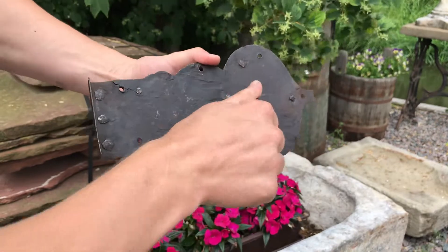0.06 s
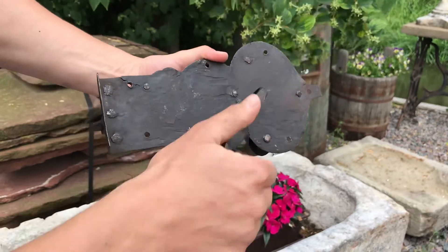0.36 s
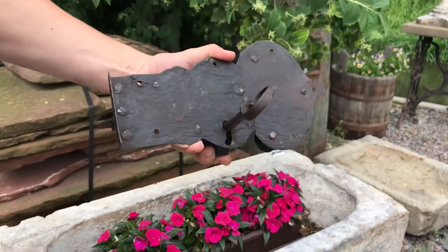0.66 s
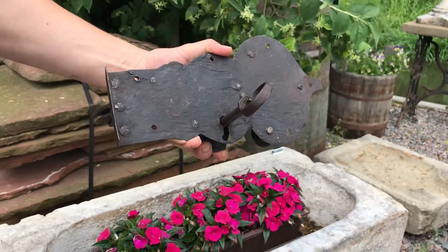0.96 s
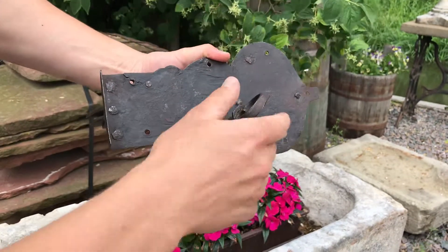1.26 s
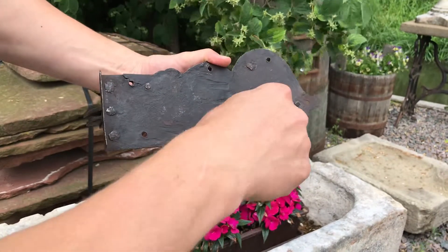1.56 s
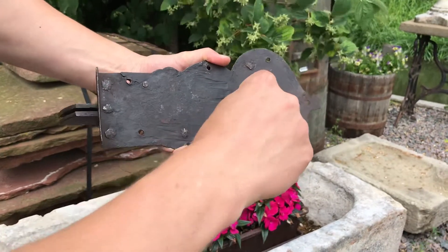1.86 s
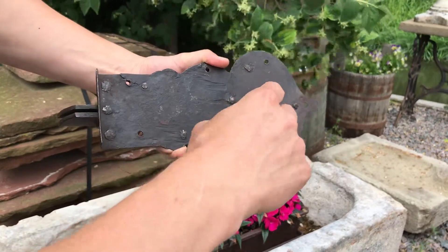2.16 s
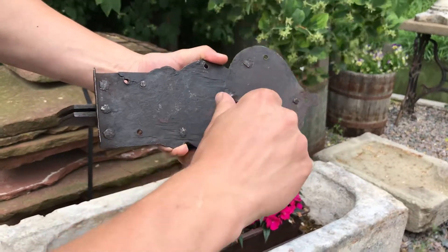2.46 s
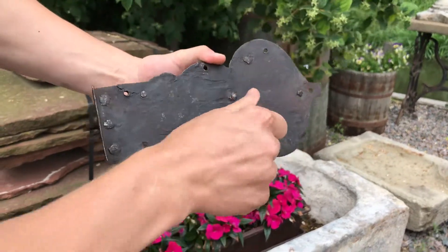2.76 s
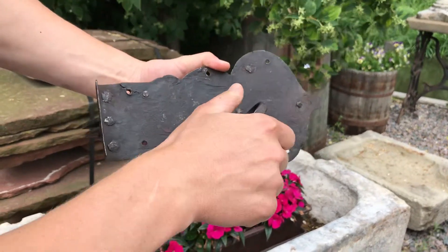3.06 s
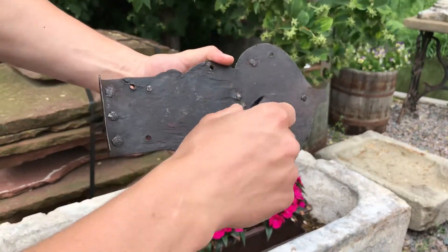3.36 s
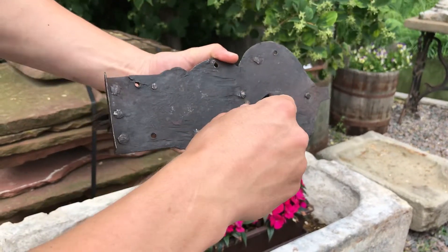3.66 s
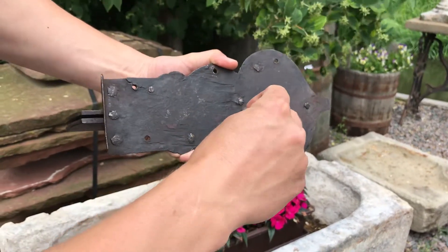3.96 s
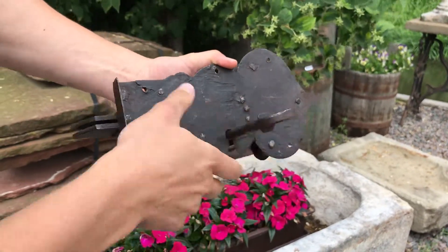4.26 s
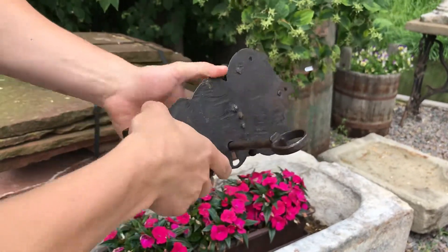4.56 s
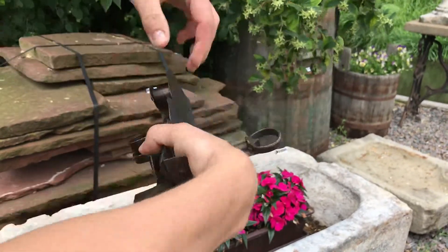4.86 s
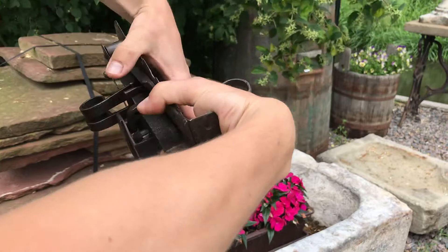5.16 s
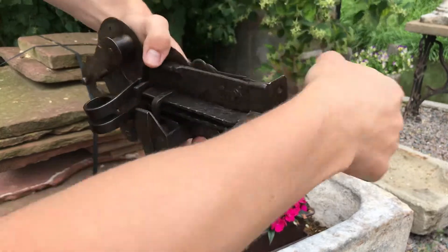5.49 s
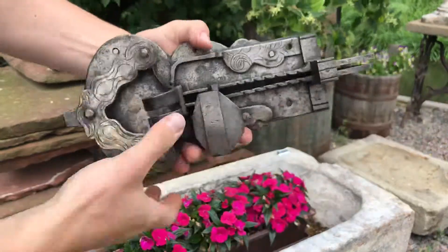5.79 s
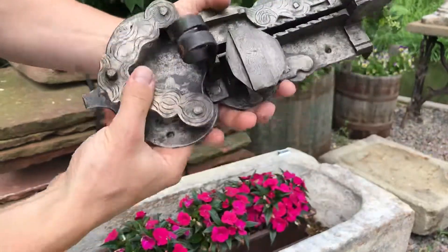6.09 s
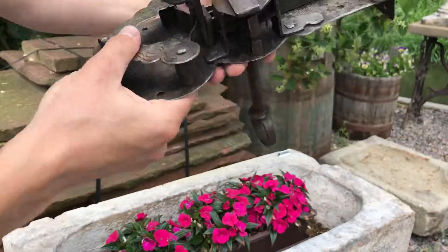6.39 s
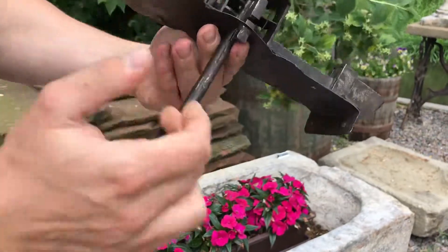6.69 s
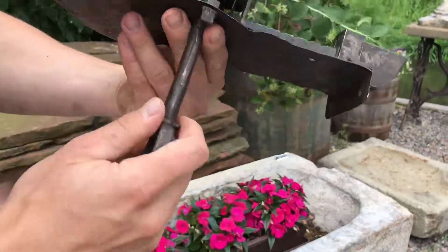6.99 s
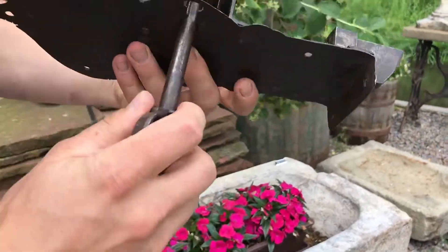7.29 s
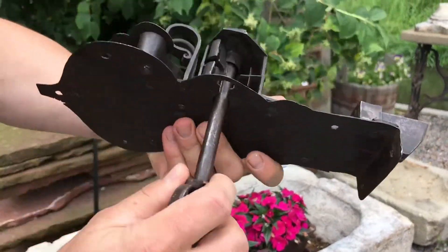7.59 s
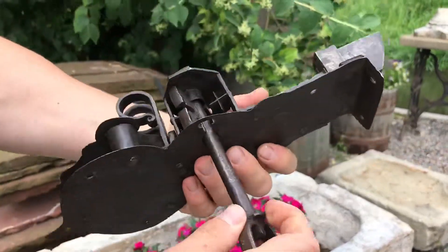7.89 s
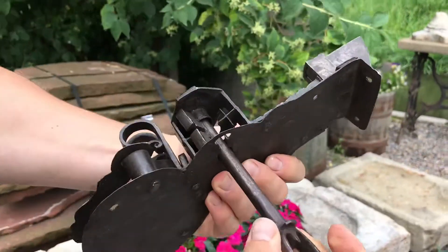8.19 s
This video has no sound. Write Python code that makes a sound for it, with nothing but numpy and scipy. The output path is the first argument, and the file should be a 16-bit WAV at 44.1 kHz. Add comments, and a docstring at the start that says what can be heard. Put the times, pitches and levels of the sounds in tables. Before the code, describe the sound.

An old iron door lock is worked by hand close to the microphone in a garden. Gusty wind rumbles and thumps on the microphone throughout, over a soft hush of leaves and very faint, distant bird chirps. A catch snaps sharply right at the start, followed by a tiny tick at about 0.7 seconds. At 1.8 seconds the key throws the sprung bolts in a loud, chattering metallic clack that rings briefly. Two smaller sharp snaps come at about 2.5 and 2.8 seconds, and a second loud clack at 3.8 seconds. From 4 to 6 seconds there is only faint iron rubbing under the wind. Between 6.2 and 7.4 seconds the loose key ticks and clinks irregularly, most clearly near 6.4 and 7.2 seconds. Faint scraping and wind continue until the end, just after 8 seconds. The impacts have only a slight outdoor echo.

```python
"""An old iron door lock is worked by hand in a garden. From the start wind buffets the microphone
and small birds call far away. A catch snaps; then the key throws the sprung bolts, which chatter home
in a loud clack that rings the case. More catches snap and the bolts are thrown again. Last, iron rubs
and the loose key clinks as the lock is turned over. A wall answers each impact faintly."""
import sys
import numpy as np
from scipy import signal
from scipy.fft import rfft, irfft, next_fast_len
from scipy.io import wavfile
from scipy.ndimage import uniform_filter1d, minimum_filter1d, map_coordinates

SR = 44100
rng = np.random.default_rng(int(sys.argv[2]) if len(sys.argv) > 2 else 0)


def unload_wav(signal):
    """Save mono or channel-first audio to the path in sys.argv[1] as 16-bit WAV at rate SR, clipped to [-1, 1]."""
    wavfile.write(
        sys.argv[1],
        SR,
        np.round(np.clip(np.atleast_2d(signal).T, -1, 1) * 32767).astype(np.int16),
    )


N = 363384
RING_T = np.arange(SR // 4) / SR  # the life of one blow, in seconds


def amp(db):
    """Decibels to amplitude ratio."""
    return 10 ** (np.asarray(db) / 20)


def unit(x):
    """The signal scaled to rms 1."""
    return x / np.sqrt(np.mean(x ** 2) + 1e-20)


def along(points, hz):
    """Interpolation of (Hz, value) points on a logarithmic frequency axis."""
    knots_hz, values = np.transpose(points)
    return np.interp(np.log(hz + 1), np.log(knots_hz + 1), values)


def wobble(rate):
    """A smooth random curve with `rate` knots a second."""
    return map_coordinates(rng.standard_normal(int(N * rate / SR) + 4), [np.arange(N) * rate / SR])


def noise(spectrum, size=len(RING_T)):
    """White noise filtered to a (Hz, dB) spectrum, at rms 1."""
    m = next_fast_len(size)
    gain = amp(along(spectrum, np.fft.rfftfreq(m, 1 / SR)))
    return unit(irfft(rfft(rng.standard_normal(m)) * gain, m)[:size])


def hump(hz, slope_db):
    """The spectrum of a broad resonance, whose skirts fall about slope_db an octave."""
    return [(hz / 16, -4 * slope_db), (hz / 1.1, 0), (hz * 1.1, 0), (hz * 16, -4 * slope_db)]


def fade(t60):
    """Damping: an exponential decay that loses 60 dB in t60 seconds."""
    return np.exp(-np.log(1000) * RING_T / t60)


def add(track, s, sound):
    """Superposition: a sound joins the track at s seconds."""
    start = max(round(s * SR), 0)
    track[start:start + len(sound)] += sound[:N - start]


def garden():
    """Broadband noise: leaves and open air make an almost steady hush."""
    # The hush. Each row: frequency in Hz, spectral level in dB.
    spectrum = [(260, -13), (450, -2), (792, -4.5), (947, 0.5), (1500, -5), (1770, -6.5), (2210, -10.5),
                (3560, -10.5), (3900, -11.5), (4800, -16), (5330, -15), (10600, -25), (13600, -23.5),
                (15800, -29.5)]
    return amp(-51.5 + 0.44 * wobble(26)) * noise(spectrum, N)


def scattered(x):
    """Diffuse scattering: hedges, pots and gravel spread a sound out in time."""
    # The garden's reverberation. Each row: frequency in Hz, t60 in seconds.
    decay_times = [(200, .25), (1500, 0.29), (5000, 0.548), (14000, 0.4)]
    hz, t, bands = signal.stft(rng.standard_normal(SR // 2), SR, nperseg=256)
    decay = amp(-60 * t / along(decay_times, hz)[:, None])
    tail = signal.istft(bands * decay, SR, nperseg=256)[1]
    return signal.fftconvolve(x, tail / np.linalg.norm(tail))[:N]


def echoes(x):
    """Reflection: a stone wall returns a dull copy 61 ms late, amid the garden's thin scatter."""
    wall = np.zeros(N)
    add(wall, .061, signal.lfilter(*signal.butter(1, 3500, fs=SR), x))
    return amp(-28.5) * (scattered(x) + wall)


def birds():
    """Frequency modulation: thin whistles glide and warble, blurred by scattering on their long way."""
    # Far calls. Each row: start and length in seconds, first and last pitch in Hz,
    # warble as a share of pitch, relative level in dB.
    calls = [(0.25, 0.172, 4636, 4665, 0.0073, -52.5), (1.149, 0.48, 4015, 3510, 0.098, -55.5),
             (2.191, .16, 3270, 3700, 0.0077, -57.5), (2.928, 0.0436, 2460, 2830, 0.0094, -55),
             (3.282, 0.257, 4008, 4200, .09, -56.5), (3.362, .045, 5646, 4100, .015, -57),
             (3.55, 0.047, 5200, 4230, 0.0223, -50), (5.429, 0.1186, 6480, 6220, 0.0277, -55.5),
             (5.803, 0.258, 3870, 3580, 0.0493, -55)]
    # One bird's repeated falling chip. Each row: start in seconds, relative level in dB.
    chips = [(6.09, -55), (6.79, -57), (6.921, -53), (7.045, -55), (7.43, -55)]
    chip_calls = [(s, .032, 5900, 5200, .015, db) for s, db in chips]
    track = np.zeros(N)
    for s, length, start_hz, end_hz, warble, db in calls + chip_calls:
        progress = np.linspace(0, 1, int(length * SR))
        glide = start_hz + (end_hz - start_hz) * np.sin(np.pi / 2 * progress)
        turns = map_coordinates(rng.standard_normal(64), [progress * length * 55], mode="mirror")
        trill = .012 * np.sin(2 * np.pi * 130 * progress * length)
        hz = glide * (1 + warble * turns + trill)
        syllables = amp(60 * warble * np.tanh(-unit(np.gradient(turns))))  # voiced on downward sweeps
        swell = np.sqrt(np.abs(np.sin(np.pi * progress)))
        add(track, s, amp(db) * syllables * swell * np.sin(2 * np.pi * np.cumsum(hz) / SR))
    return amp(-3) * track + amp(-8) * scattered(track)


def gust_power(rows, sag_db, release_s):
    """Incoherent sources add in power: each (start, length, dB) gust rises fast, sags and dies away."""
    attack_s = 0.00472
    t, power = np.arange(N) / SR, np.zeros(N)
    for s, length, db in rows:
        near = (t > s - .1) & (t < s + length + .3)
        age = t[near] - s
        edges = np.exp(np.minimum(age, 0) / attack_s - np.maximum(age - length, 0) / release_s)
        level_db = db - sag_db * (np.clip(age / length, 0, 1) - .5)
        power[near] += (amp(level_db) * edges) ** 2
    return power


def wind():
    """Turbulence at the microphone: big eddies rumble throughout, small ones flutter in the gusts."""
    # The breeze between gusts. Each row: time in seconds, relative level in dB.
    breeze = [(0.0, -43.5), (0.69, -31), (1.19, -28), (1.42, -44), (2.02, -28.5), (3.14, -31.5), (3.3, -43),
              (5.62, -38), (5.83, -41), (6.47, -31), (7.14, -42.5), (7.3, -38), (7.78, -41), (8.24, -22)]
    # Gusts. Each row: start and length in seconds, relative rumble and flutter levels in dB.
    gusts = [(0.17, 0.036, -21, -44.5), (0.226, 0.063, -25.5, -44.5), (0.414, 0.032, -24.5, -49),
             (0.622, 0.087, -22.5, -35.5), (0.79, 0.0333, -23, -42.5), (0.98, 0.0563, -19.5, -33),
             (1.061, 0.1334, -21.5, -38.5), (1.244, 0.052, -28.5, -56.5), (1.339, 0.0397, -26, -44),
             (1.543, 0.1206, -22, -39.5), (1.801, 0.0458, -19, -45.5), (1.912, 0.06, -17, -31.5),
             (1.993, 0.1723, -18.5, -36), (2.209, 0.039, -30.5, -58), (2.271, 0.0266, -19.5, -32.5),
             (2.333, 0.051, -22.5, -41), (2.462, 0.1053, -20, -31.5), (2.609, 0.0213, -26, -45),
             (2.674, 0.0842, -17, -28), (2.87, 0.031, -27.5, -52.5), (2.926, 0.3437, -21, -37),
             (3.532, 0.0368, -17.5, -36.5), (3.667, 0.0364, -19.5, -37), (4.105, 0.0577, -22.5, -51.5),
             (4.756, 0.1037, -20.5, -36.5), (4.931, 0.0328, -27.5, -43), (5.147, 0.0165, -25, -64),
             (5.286, 0.067, -25, -35.5), (5.381, 0.021, -22, -43.5), (5.512, 0.0516, -22.5, -38.5),
             (5.6, 0.0835, -23.5, -41), (5.721, 0.0472, -26, -48), (5.959, 0.0646, -24.5, -40.5),
             (6.023, 0.0252, -21, -46.5), (6.081, 0.0218, -24.5, -49), (6.32, 0.0688, -19.5, -34),
             (6.563, 0.034, -26, -65.5), (6.741, 0.0475, -20, -37.5), (6.804, 0.0915, -20.5, -39.5),
             (7.086, 0.065, -22, -34.5), (7.21, 0.0335, -24, -44), (7.272, 0.035, -23.5, -55.5),
             (7.357, 0.068, -22, -36.5), (7.502, 0.062, -24.5, -40.5), (7.552, 0.044, -22.5, -36),
             (7.635, 0.0657, -21.5, -54), (7.865, 0.042, -25, -41.5), (7.951, 0.082, -17.5, -34.5),
             (8.105, 0.0416, -23.5, -45.5), (8.183, 0.099, -28, -34)]
    # Big eddies. Each row: frequency in Hz, spectral level in dB.
    rumble_spectrum = [(18, -33), (32, -4.5), (52, 5), (85, 2), (135, -6), (200, -25), (350, -36),
                       (600, -68.5), (1200, -68)]
    # Small eddies. Each row: frequency in Hz, spectral level in dB.
    flutter_spectrum = [(60, -41), (140, 6), (230, 0), (400, -18), (700, -53.5), (1500, -58.5),
                        (3000, -93.5)]
    breeze_db = np.interp(np.arange(N) / SR, *np.transpose(breeze)) - 0.5 * np.tanh(wobble(14))
    big = gust_power([(s, span, db - 5.5) for s, span, db, _ in gusts], sag_db=2.5, release_s=0.0165)
    small = gust_power([(s, span, db + 0.5) for s, span, _, db in gusts], sag_db=5, release_s=0.0106)
    eddies = noise(rumble_spectrum, N)
    local_power = np.abs(uniform_filter1d(eddies ** 2, size=SR // 25))
    even_eddies = unit(eddies / np.sqrt(local_power + 0.067))
    puffs_db = 7 * np.tanh(wobble(45))
    rumble_gain = np.sqrt(big + amp(breeze_db - 5) ** 2) * amp(.45 * puffs_db)
    flutter_gain = np.sqrt(small + amp(breeze_db - 16.5) ** 2) * amp(puffs_db)
    return rumble_gain * even_eddies + flutter_gain * noise(flutter_spectrum, N)


def buffets():
    """Pressure pulses: a hard eddy gives one low push with a short slap on top."""
    # Hard eddies. Each row: start in seconds, relative level in dB, relative slap level in dB.
    pulses = [(0.635, -15.5, -18), (1.034, -27, -11.5), (1.162, -10.5, -17.5), (1.607, -5.5, -24.5),
              (1.912, -13.5, -10.5), (2.0142, -9.5, -4), (2.267, -16, -24.5), (2.36, -9, -23.5),
              (2.706, -2, -24.5), (2.736, -6.5, -19), (3.011, -17, -8.5), (3.045, -14.5, -14),
              (3.062, -3.5, -26.5), (3.192, -10, -23.5), (3.679, -6.5, -28), (4.108, -13.5, -39.5),
              (4.568, -22, -20), (4.955, -17, -18.5), (5.29, -8, -32.5), (5.391, -14, -25),
              (5.612, -12.5, -26.5), (6.383, -9.5, -24), (6.843, -8.5, -24.5), (8.033, -19.5, -4.5)]
    # The slap. Each row: frequency in Hz, spectral level in dB.
    slap_spectrum = [(100, -2), (250, 7.5), (480, -9), (850, -23.5), (1500, -51), (3000, -76.5),
                     (8000, -130)]
    track = np.zeros(N)
    for s, db, slap_db in pulses:
        push_hz = 90 * np.exp(0.424 * rng.standard_normal())
        push = np.sin(2 * np.pi * push_hz * RING_T) * fade(0.056)
        tilt_db = 0.367 * max(slap_db + 19.5, 0)  # per octave: a harder slap reaches higher
        colour = [(hz, level + tilt_db * np.log2(1 + (hz / 600) ** 2) / 2) for hz, level in slap_spectrum]
        slap = amp(slap_db + 12) * noise(colour) * fade(0.03595)
        add(track, s, amp(db) * (push + slap) * (1 - fade(0.00819)) ** 2)
    return track


def rubs():
    """Sliding friction: rough iron scratches unevenly under the hands and the key."""
    # Strokes. Each row: start and length in seconds, centre frequency in Hz, relative level in dB.
    strokes = [(4.005, 0.082, 5500, -59.5), (4.008, 0.347, 1026, -54), (4.154, 0.65, 1670, -57),
               (4.291, 0.0372, 1780, -48), (5.046, 0.89, 1450, -58), (5.879, 0.57, 6900, -60),
               (6.081, 0.0383, 1664, -46.5), (7.11, 0.218, 6900, -52), (7.418, 0.088, 9000, -57),
               (7.805, 0.2045, 7170, -54.5), (8.092, 0.14, 10040, -58.5)]
    track = np.zeros(N)
    grit = unit(amp(4.2 * wobble(250) + 2.8 * wobble(25)))
    for s, length, hz, db in strokes:
        swell = np.sqrt(np.hanning(int(length * SR)))
        add(track, s, amp(db) * swell * noise(hump(hz, slope_db=13), len(swell)))
    return track * grit


def ring(modes, scatter_db):
    """Modal vibration: each contact point drives the damped modes with new strengths and phases."""
    hz, db, t60 = np.transpose(modes)[:, :, None]
    gain = amp(db + scatter_db * rng.standard_normal(hz.shape))
    phase = rng.uniform(0, 2 * np.pi, hz.shape)
    partials = gain * fade(t60) * np.sin(2 * np.pi * hz * RING_T + phase)
    return np.sum(partials, axis=0) / np.linalg.norm(amp(db))


def key():
    """A brief impact excites high modes: the loose key taps its guide with a tick and a thin clink."""
    # Taps. Each row: start in seconds, relative level and case boom in dB, nominal t60 in seconds,
    # frequency of one prominent mode in Hz, ring level in dB.
    taps = [(.741, -35, -20.5, 0.029, 9200, -17), (4.271, -45, 3, .03, 1560, -9),
            (6.2066, -22.5, 15, 0.0312, 3080, 0), (6.3333, -27, 22, 0.036, 1700, -15.5),
            (6.3627, -11.5, 2.5, 0.095, 5130, 7), (6.399, -20.5, 14.5, 0.0557, 8410, -20.5),
            (6.5236, -27, -3.5, 0.022, 8800, -10.5), (6.6323, -18, -3.5, 0.0526, 9500, -10),
            (6.6846, -14, -12.5, 0.0566, 12600, -0.5), (6.9636, -31.5, 14.5, 0.052, 5400, 2.5),
            (7.1967, -7.5, 1.5, 0.0453, 1152, -8), (7.2132, -21.5, 1.5, 0.072, 9000, -16.5),
            (7.336, -22.5, 0.5, 0.0203, 10700, -11.5), (7.768, -41, 7, 0.05, 13500, -10.5)]
    # The key's clear modes. Each row: frequency in Hz, level in dB, free t60 in seconds.
    modes = [(1515.6, -0.5, 0.11), (3273, -11.5, 0.04), (5130, -4, 0.073), (5960, -11.5, 0.126),
             (8410, 0, 0.07), (8640, -10, 0.144), (8700, -38.5, 0.058), (9968, 0.5, 0.032),
             (11470, -3, 0.027), (13500, -3, 0.05), (15550, -6, .08)]
    # Its crowded, short-lived modes. Each row: frequency in Hz, spectral level in dB.
    spectrum = [(200, -22.5), (750, -5), (1100, 0.5), (2300, -1.5), (4200, 4.5), (5500, 3), (7500, 0),
                (8600, 0.5), (11000, -1.5), (12500, 0), (15800, -2.5)]
    track = np.zeros(N)
    for s, db, boom_db, t60, hz, ring_db in taps:
        # a glancing tap that hardly moves the case loses its lower modes; a heavy one is duller
        colour = [(f, level + min(boom_db, 0) / (1 + (f / 4500) ** 4) - max(boom_db, 0) * f / 38000)
                  for f, level in spectrum]
        clash = noise(colour) * (fade(t60 * 0.957) + 1.245 * fade(0.0131))
        boom = amp(boom_db - 15.5) * noise(hump(1580, slope_db=48)) * fade(t60)
        prominent = amp(-3) * np.sin(2 * np.pi * hz * RING_T) * fade(t60)
        tones = ring(modes, scatter_db=4) * fade(t60 * 2) + prominent
        attack = 1 - fade(0.000267)
        add(track, s, amp(db - 11.5) * (clash + boom + amp(ring_db) * tones) * attack)
    return track


def catch_contacts():
    """Rebound: each catch grazes its edge, snaps against the case and bounces once."""
    # Catches. Each row: time in seconds, relative level and boom in dB, boom frequency in Hz,
    # treble tilt in dB, nominal t60 in seconds.
    catches = [(0.1261, -7, 8, 1297, 4, 0.0197), (2.4531, -12.5, -10, 1460, 6, 0.0412),
               (2.666, -38, 4, 1560, -1.5, 0.132), (2.7039, -30.5, 7, 1540, -19.5, 0.051),
               (2.793, -8.5, 4.5, 1272, 8, 0.0347)]
    rows = []
    for s, db, boom_db, boom_hz, treble_db, t60 in catches:
        graze, snap, bounce = (-0.0033, -16, 0.053), (0, 0, t60), (.0056, -14, 0.0617)
        for delay, contact_db, contact_t60 in graze, snap, bounce:
            rows.append((s + delay, db + contact_db, boom_db, boom_hz, treble_db, contact_t60))
    return rows


def bolt_contacts():
    """Stored spring energy drives the bolts home in the same chatter of contacts at each throw."""
    # Throws of the bolts. Each row: time in seconds, strength in dB.
    throws = [(1.7868, -5.5), (3.7775, -6)]
    # Contacts from the slip of the spring to the last bounce. Each row: delay in seconds,
    # relative level, boom and treble tilt in dB, nominal t60 in seconds.
    chatter = [(-.013, -31, -7, 6.5, .03), (-.0047, -7, -4, 3, 0.054), (0, 1.5, -9, 6.5, 0.08),
               (.01, 3, -6, 10.5, 0.072), (0.0156, 3.5, -3, 0, 0.088), (0.0236, 8, -12.5, 2.5, .047),
               (.036, -5, 4.5, -5, .05), (.072, -26, 5.5, -11, 0.0675)]
    boom_hz = 1500
    return [(s + delay, strength_db + db, boom_db, boom_hz, treble_db, t60)
            for s, strength_db in throws for delay, db, boom_db, treble_db, t60 in chatter]


def struck_case(contacts):
    """Impact excitation: iron on iron cracks, rings and booms in the flat case, damped by the hand."""
    # Clear modes of the riveted case and bolts. Each row: frequency in Hz, level in dB,
    # free t60 in seconds.
    modes = [(1133, -6, 0.041), (1349, 2, 0.0341), (1462.3, -2, .07), (1515.7, 4, 0.064), (2129, -12, .08),
             (3494, -5.5, .07), (3783, -8.5, .04), (3761, -1.5, 0.0519), (4208, 5, 0.0283),
             (4680, -6.5, 0.056), (5240, 1.5, 0.089), (5388, -1.5, 0.0514), (5509, 2.5, 0.052),
             (6188, 2, 0.061), (6888, 4, 0.023), (9676, -6.5, 0.059)]
    # Their crowded, short-lived modes. Each row: frequency in Hz, spectral level in dB.
    spectrum = [(200, -14), (700, -10.5), (1000, -2), (2400, -3), (4000, -1.5), (4900, -4.5), (5400, -5.5),
                (7000, -3), (7700, -9), (9400, -4), (10500, -10), (13500, -8), (15800, -22.5)]
    track = np.zeros(N)
    own_ring = noise(spectrum)  # alike wherever the case is struck
    for s, db, boom_db, boom_hz, treble_db, t60 in contacts:
        colour = [(hz, level + treble_db * np.log2(1 + hz / 6000)) for hz, level in spectrum]
        crack = (0.024 / t60) ** 2 * fade(0.011)  # a tightly held catch gives more crack than ring
        clash = unit(noise(colour) + amp(treble_db - 6.5) * own_ring) * (fade(t60) + crack)
        boom = amp(boom_db - 5) * noise(hump(boom_hz, slope_db=32)) * fade(t60)
        tones = ring(modes, scatter_db=2) * fade(t60 * 5)
        attack = 1 - fade(0.00212)
        add(track, s, amp(db - 7) * (clash + boom + tones) * attack)
    return track


def scene():
    """Superposition: the lock, its echoes, the wind and the garden sum at one microphone."""
    lock = struck_case(bolt_contacts() + catch_contacts()) + key() + rubs()
    return (lock + echoes(lock) + wind() + buffets() + birds() + garden())[None]


def gain_control(x):
    """Limiting: a loud clack turns the gain down at once; it is held briefly and then recovers."""
    ceiling_db, hold, recover_db_per_s = -7.5, int(0.196 * SR), 112
    level_db = 10 * np.log10(np.abs(uniform_filter1d(x[0] ** 2, size=SR // 300)) + 1e-12)
    cut_db = minimum_filter1d(np.minimum(ceiling_db - level_db, 0), hold, origin=(hold - 1) // 2)
    rise_db = recover_db_per_s * np.arange(N) / SR
    return x * amp(np.minimum.accumulate(cut_db - rise_db) + rise_db)


def record(dry):
    """Saturation and band limiting: the camera ducks, rounds off peaks, drops deep bass and top treble."""
    low_cut_hz, top_hz = 37.5, 16150
    ducked = gain_control(dry)
    rounded = ducked / (1 + np.abs(ducked / .95) ** 4) ** (1 / 4)
    m = next_fast_len(N + SR // 4)
    hz = np.fft.rfftfreq(m, 1 / SR)
    low_pass = np.clip((top_hz - hz) / 500, 0, 1)
    high_pass = hz ** 4 / np.hypot(hz ** 4, low_cut_hz ** 4)
    return irfft(rfft(rounded, m) * low_pass * high_pass, m)[:, :N]


dry = scene()
out = record(dry)
unload_wav(out)
```